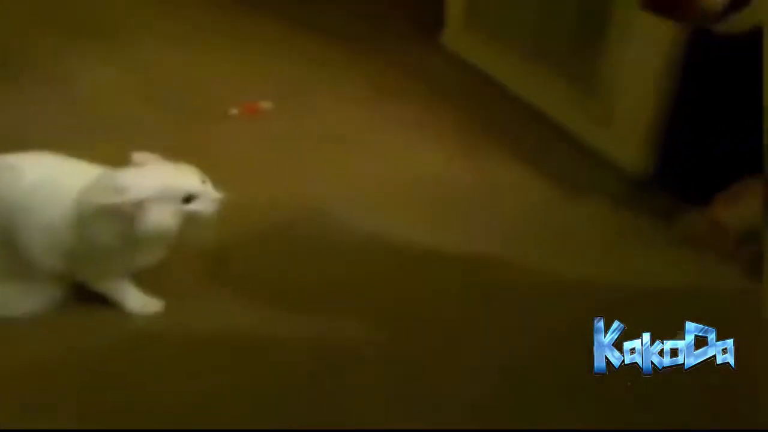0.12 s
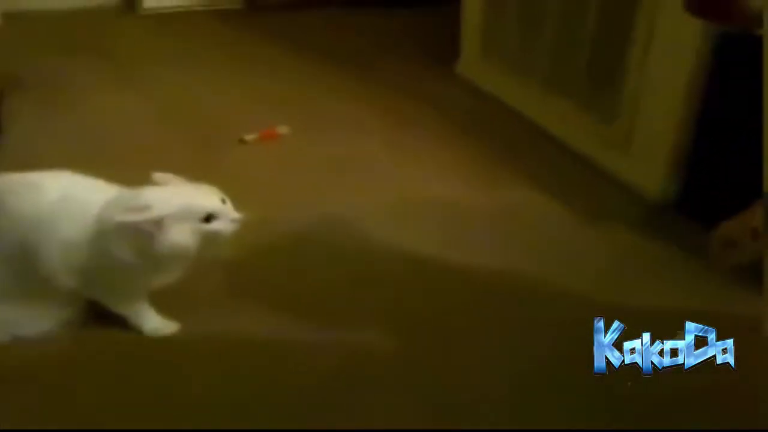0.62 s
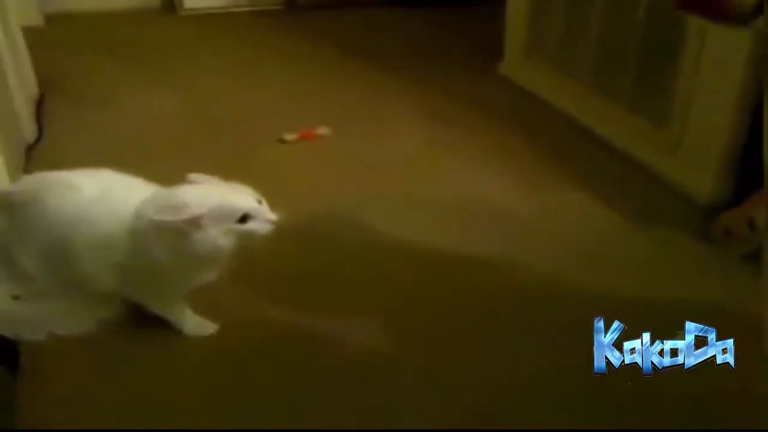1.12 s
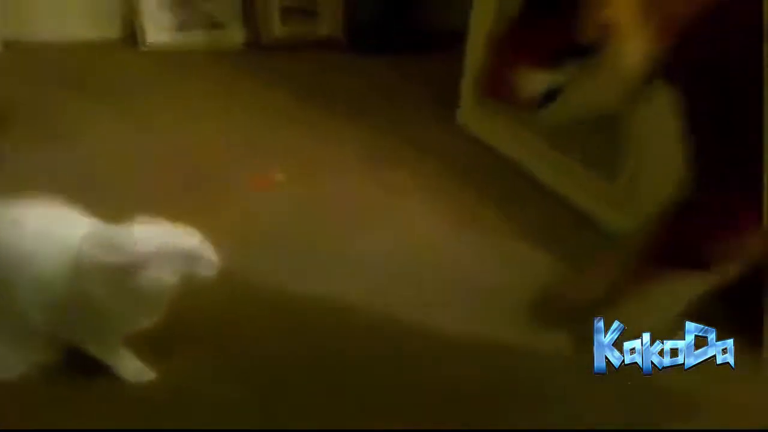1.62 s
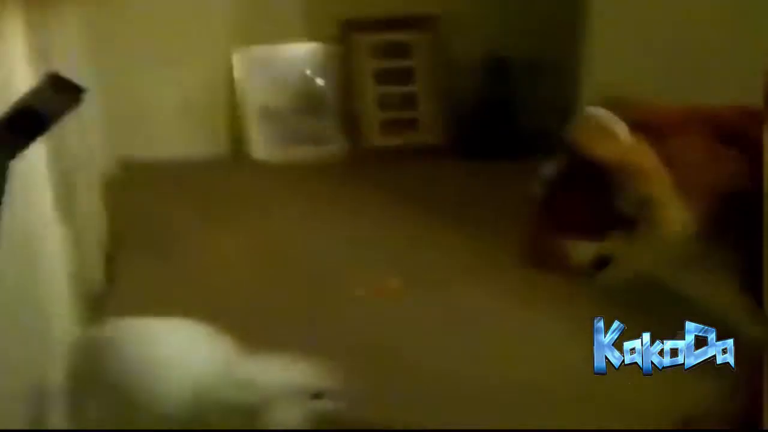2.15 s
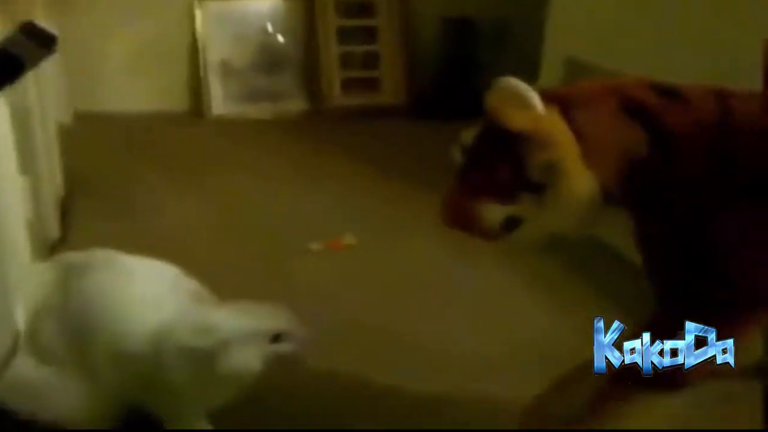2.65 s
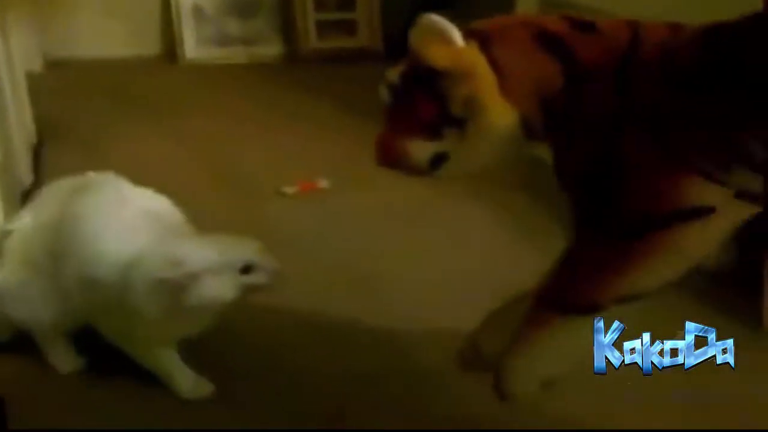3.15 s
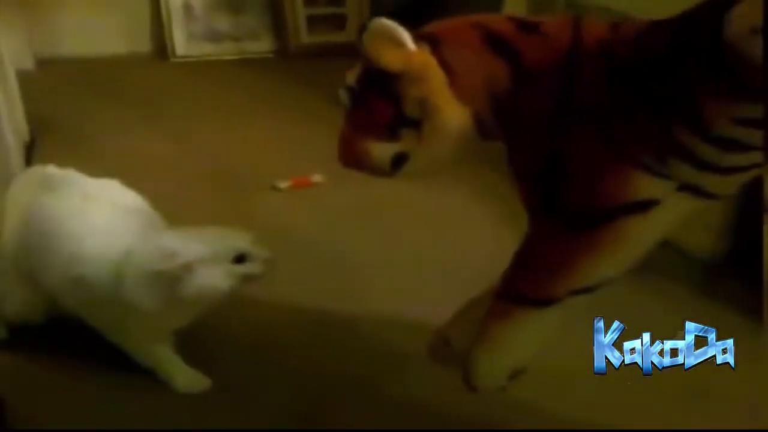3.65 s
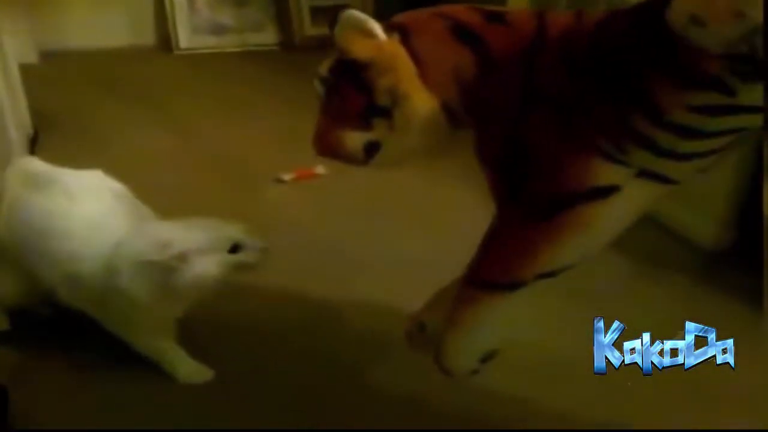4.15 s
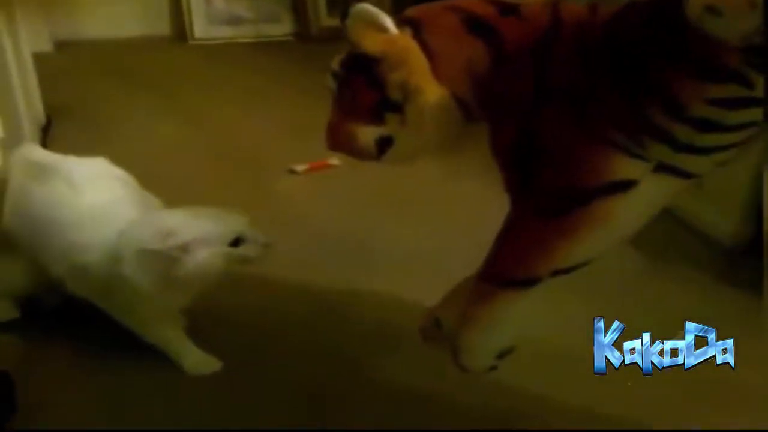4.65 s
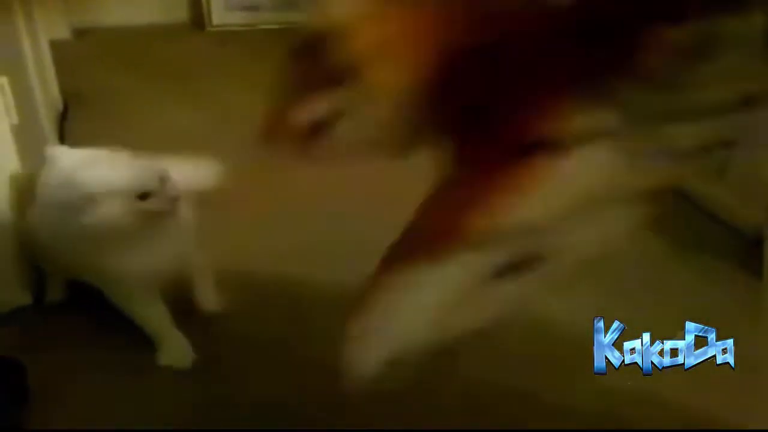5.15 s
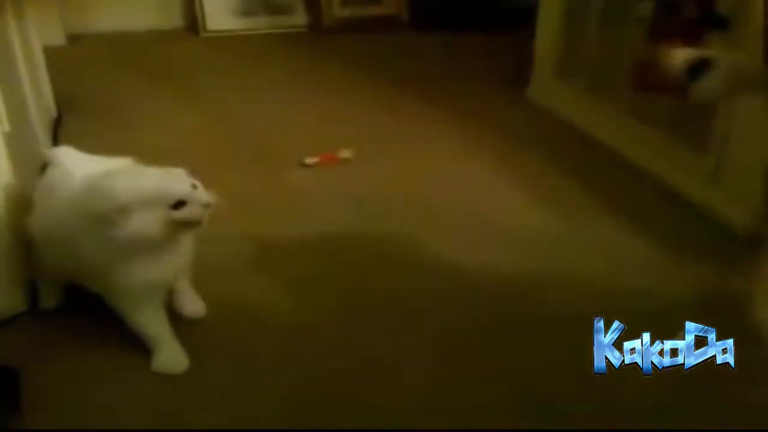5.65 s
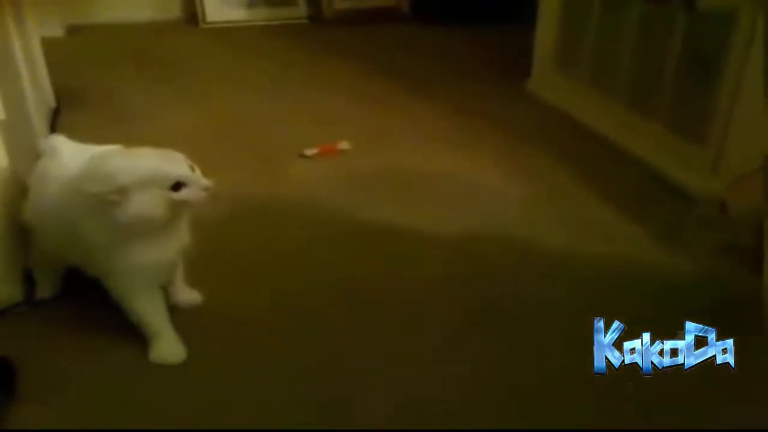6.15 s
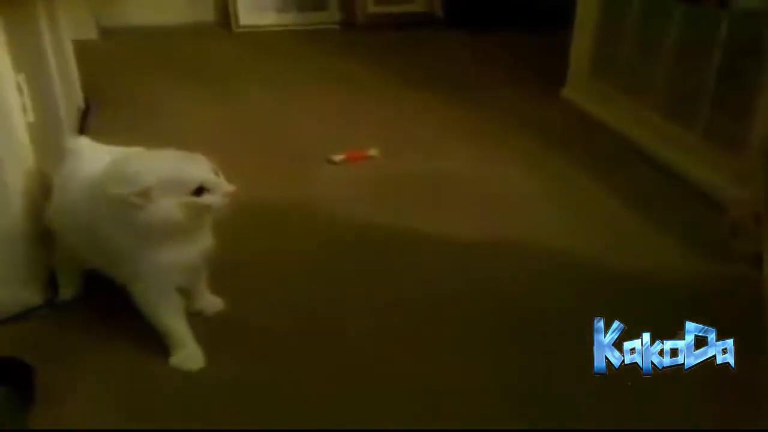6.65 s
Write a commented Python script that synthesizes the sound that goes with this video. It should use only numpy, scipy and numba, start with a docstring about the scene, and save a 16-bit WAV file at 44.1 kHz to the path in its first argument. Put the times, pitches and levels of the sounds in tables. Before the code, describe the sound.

In a carpeted room with a low steady hum, a cat's hoarse low wail glides down, then a small dog very close yaps three times, loud enough to overload the microphone. Ticks, soft thuds and a carpet drag follow. The cat wails high and long, sinking beneath three more barks, the last trailing into a whimper. A scuff, a long soft hiss and one quieter bark end it.

```python
"""A low hum lies under it all. A cat glides down a low wail on a carpeted floor: drifting harmonics and leaking breath.
From 0.57 s a small dog close by barks three times: rough pulses and gasping air through throat resonances.
Dry ticks, soft thuds and a drag of coloured noise follow; at 2.5 s the cat wails high, sinking under three more barks.
The third of these trails into a whimper; then come a scuff, a long soft hiss and at 6.15 s a last, quieter bark.
The cat and the barks ring on in the room through crossed delay lines, and the loud barks overload the input."""
import sys
import numpy as np
from scipy import signal
from scipy.fft import rfft, irfft
from scipy.io import wavfile
from scipy.ndimage import uniform_filter1d
from numba import njit

SR = 44100
rng = np.random.default_rng(int(sys.argv[2]) if len(sys.argv) > 2 else 0)


def digitize_waveform(pressure):
    """Quantize a signal to 16-bit integers and store it at the path in sys.argv[1].

    Rows of a 2-D input are taken as channels; values are limited to [-1, 1].
    """
    field = np.atleast_2d(pressure).T
    bounded = np.clip(field, -1, 1)
    quanta = np.round(bounded * 32767).astype(np.int16)
    wavfile.write(sys.argv[1], SR, quanta)


def makeup_ratio(level_db):
    """Linear amplitude ratio for a level in decibels (20 dB per factor of ten)."""
    decades = np.asarray(level_db, float) / 20
    return 10 ** decades


N = 298998
T = np.arange(N) / SR

# spectrum of the hum: f/Hz, relative level/dB
HUM_COLOUR = [(24, -65), (40, -41.5), (120, -2), (252, -7), (327, -16.5), (350, -16.5), (937, -25.5),
              (1000, -25), (1140, -27.5), (1850, -33.5), (7500, -45.5), (9750, -93), (16500, -120)]
# dry ticks: t/s, level/dB of the swell, f/Hz
TICKS = [(0.4252, -36, 2695), (1.6663, -34, 6140), (1.6834, -36, 3866), (1.7067, -33.5, 4450),
         (1.712, -30.5, 5340), (1.744, -34, 3300), (1.755, -36, 3530), (2.1764, -43, 5730),
         (2.263, -40, 6700), (5.1114, -43, 3920), (5.146, -42, 3800), (5.163, -39, 3800),
         (6.0011, -37, 2880)]
# soft thuds on the floor: t/s, level/dB of the swell, f/Hz
THUDS = [(1.672, -37, 284), (1.818, -42, 210.5), (2.136, -43, 431), (2.17, -35, 503), (2.383, -41, 448)]
# something soft drags over the carpet: t/s, mean level/dB
DRAG_LEVEL = [(1.75, -53), (1.924, -55.5), (2.17, -44), (2.24, -49), (2.436, -49.5), (2.5, -51.5)]
# spectrum of the drag: f/Hz, relative level/dB
DRAG_COLOUR = [(200, -8), (400, 13.5), (1000, -6.5), (1500, -30.5), (4500, -53), (5800, -19), (7000, -33)]
# a short scuff: t/s, mean level/dB
SCUFF_LEVEL = [(5.0, -64), (5.07, -54.5), (5.105, -52), (5.12, -42.5), (5.16, -47), (5.28, -74.5)]
# resonances of the scuff: f/Hz, width/Hz, relative level/dB
SCUFF_RINGS = [(1080, 230, 3.5), (2034, 710, -19), (3800, 200, -12.5), (4430, 230, -15.5),
               (5800, 1400, -24)]
# the cat's long soft hiss: t/s, mean level/dB
HISS_LEVEL = [(5.38, -77.5), (5.45, -61), (5.692, -56.5), (6.0, -53), (6.054, -55.5), (6.14, -70)]
# resonances of the hiss: f/Hz, width/Hz, relative level/dB
HISS_RINGS = [(1030, 450, 1), (1950, 930, -4.5), (2810, 620, -5), (3600, 540, -12), (6370, 830, -12.5)]
# barks: start t/s, lead-in/s, attack/s, hold/s, release/s, level/dB before the shape, peak pitch f/Hz, end pitch f/Hz
BARKS = [(0.569, .011, 0.022, 0.072, .022, -4, 789, 707.5), (0.93, .008, .018, .078, .045, -3.5, 821, 685),
         (1.209, 0.027, 0.029, 0.072, .03, -2, 788.5, 560),
         (4.006, .022, .025, .055, 0.057, -7.5, 815.5, 560),
         (4.255, .03, .027, .055, .08, -4, 909.3, 470.1), (4.461, .018, .018, .078, .068, -5, 775.3, 435.3),
         (6.152, 0.029, .008, 0.053, 0.055, -18, 650.6, 538.7)]
# shape of every bark: stage (0-1 lead-in, 1-2 attack, 2-3 hold, 3-4 release), level/dB, share of the peak pitch,
# share of the fall in pitch, added upper throat level/dB, mouth factor, added roughness
BARK_SHAPE = [(0, -25.5, .72, 0.03, -7.5, .7, -.15), (1, -11.5, .88, 0, -6.5, .95, -0.14),
              (1.999, -2, 0.98, 0.0021, -3.5, 1.03, -0.09), (2.5, -1.22, .99, .08, 0.8, 1.013, .05),
              (2.999, -4.5, .99, .25, 2.5, .97, .08), (3.4, -12, .99, .65, 0, .93, -0.037),
              (4.002, -23, .99, 0.97, -6, 1.2, -.1)]
# voice of each bark before the shape: upper throat level/dB, mouth opening as factor on the resonances,
# roughness (0-1), fizz level/dB, factor on the fizz resonances
BARK_VOICE = [(-1.5, .98, .48, -19.5, 0.84), (-2.5, 1.03, .55, -19.5, 0.72), (1, .92, .55, -27.5, 1.1),
              (3, .99, .68, -20.5, 1.08), (2.5, .93, .62, -23, 1.3), (1.5, .85, .56, -28.5, 1.1),
              (-2, 0.922, .8, -11.5, 1.082)]
# the sixth bark trails off in a low whimper: t/s, pitch f/Hz, level/dB
WHIMPER = [(4.656, 437, -31.5), (4.72, 418.4, -33.5), (4.76, 468, -22), (4.8, 452.7, -30),
           (4.871, 452, -43)]
# voice of the whimper: same columns as BARK_VOICE
WHIMPER_VOICE = (-4, 0.67, .3, -22.5, 4.5)
# throat resonances before the mouth factor: f/Hz, width/Hz, relative level/dB
DOG_THROAT = [(1253, 820, -2), (1480, 450, 0.5), (2019, 260, 3.5)]
# fizz resonances before both factors: f/Hz, width/Hz, relative level/dB
DOG_FIZZ = [(2700, 2200, -5.5), (4610, 1400, 2), (5630, 270, -7.5), (6100, 1100, -14)]
# low wail: t/s, pitch f/Hz, rms level/dB of harmonics 2, 3 and 4
WAIL_LOW = [(0.0, 440, -28, -40.5, -56), (0.054, 427, -34.5, -44.5, -66), (0.084, 409, -36.5, -46, -75),
            (0.106, 402, -35.5, -41, -59.5), (0.21, 396.8, -36, -38, -69),
            (0.266, 387.5, -38.5, -50.5, -55), (0.312, 387.4, -32.5, -36, -58.5),
            (0.356, 380.6, -36.5, -44.5, -65), (0.438, 383.4, -39, -39.5, -57.5),
            (0.47, 376.3, -39, -47, -54.5), (0.566, 364.5, -56.5, -31, -54)]
# high wail: same columns
WAIL_HIGH = [(2.485, 515.2, -51, -81.5, -80.5), (2.497, 498, -45, -74, -59.5),
             (2.539, 572.3, -31.5, -54.5, -59.5), (2.589, 602.2, -35.5, -46, -40.5),
             (2.603, 605.6, -56.5, -57, -53), (2.619, 607, -39.5, -40, -48), (2.687, 627, -42, -30, -59.5),
             (2.707, 562, -40, -36.5, -41.5), (2.721, 560.6, -36.5, -27.5, -40.5),
             (2.737, 548.8, -33, -36.5, -30.5), (2.843, 547, -32.5, -37.5, -34.5),
             (2.863, 545.9, -36, -62, -33.5), (2.905, 547.5, -33, -48, -31.5),
             (2.957, 548.5, -36.5, -28, -34.5), (3.079, 539.6, -36, -24.5, -31),
             (3.117, 536.2, -34, -44, -32.5), (3.133, 534.5, -31.5, -23.5, -34.5),
             (3.189, 531.5, -33.5, -21, -39.5), (3.217, 540, -32, -43, -40.5),
             (3.235, 534.8, -30, -27, -33), (3.315, 532.3, -28.5, -25, -31),
             (3.335, 527.3, -28.5, -28.5, -49), (3.361, 520.4, -30, -24.5, -34.5),
             (3.387, 518.8, -24.5, -28.5, -38), (3.969, 517.9, -25, -25.5, -37.5),
             (4.0, 516.4, -27.5, -33.5, -36.5)]
# the high wail sinks away under the barks: same columns
WAIL_END = [(4.14, 504, -31, -33, -40), (4.27, 490, -31, -35, -43), (4.45, 497, -42, -46, -52),
            (4.62, 502, -48, -50, -56), (4.77, 472, -52, -58, -60), (4.815, 458, -56, -62, -64),
            (4.85, 432, -70, -75, -78)]
# level/dB against the low wail's loudness: fundamental, harmonics from 8 up (these before CAT_TREBLE)
WEAK_LOW = (-17.5, -25)
# the same two levels/dB for the high wail
WEAK_HIGH = (-29, -26.5)
# mouth colour of harmonics 5 to 7, low wail: f/Hz, level/dB against the loudness before CAT_TREBLE
CAT_MID_LOW = [(1850, -23.5), (2100, -23.5), (2300, -13.5), (2650, -17), (3000, -38.5)]
# the same for the high wail
CAT_MID_HIGH = [(2300, -8.5), (2450, -19), (2600, -22.5), (2750, -23), (3150, -23), (3300, -27.5),
                (3650, -35.5), (4300, -24.5)]
# colour of harmonics 8 to 19, low wail: f/Hz, relative level/dB
CAT_TOP_LOW = [(1760, -33), (3000, -14), (3830, -19), (4390, -1), (6030, -22), (6940, -18.5), (7400, -40.5),
               (9620, -76), (16300, -120)]
# the same for the high wail
CAT_TOP_HIGH = [(2350, -35.5), (4000, -16), (4500, -20.5), (4680, 3), (4850, -14), (6590, -17.5),
                (7400, -32.5), (9620, -65), (16300, -120)]
# treble of the cat against its loudness: t/s, level/dB
CAT_TREBLE = [(0, -5.5), (.1, -.5), (.5, 2.5), (2.49, -12.5), (2.55, -5), (2.62, 3.5), (2.7, -6), (2.76, 4),
              (3.0, -1.5), (3.2, -0.5), (3.4, -4.5), (4.0, -1.5), (4.3, -0.5), (4.62, 7), (4.82, 3.5)]
# how hoarse the cat is: t/s, roughness (0-1)
CAT_ROUGH = [(0, .6), (.1, .7), (.15, .45), (2.5, .8), (2.65, .55), (2.7, 1), (2.8, .65), (3.35, .5),
             (3.42, .15)]
# spectrum of the cat's breath: f/Hz, relative level/dB
CAT_BREATH = [(900, -32), (1800, 0), (3000, 0.5), (5500, -0.5), (7200, -7.5)]


def unit(x):
    """Brings a sound to rms 1."""
    return x / np.sqrt(np.mean(x ** 2))


def steady(x):
    """Even power over about 15 ms, as a steady push of the lungs gives."""
    return x / np.sqrt(uniform_filter1d(x ** 2, size=660) + 1e-12)


def curve(rows, column, outside=None):
    """One column of a table at every sample; outside replaces the held end values."""
    rows = np.array(rows, float)
    return np.interp(T, rows[:, 0], rows[:, column], outside, outside)


def walk(rate):
    """Slow random drift: levels held 1 / rate seconds and slewed twice."""
    k = max(int(SR / rate), 2)
    held = np.repeat(rng.standard_normal(N // k + 1), k)
    return 0.97 * uniform_filter1d(uniform_filter1d(held, k), k)[:N]


def tint(hz, points):
    """Gain of a spectrum table at the given frequencies, straight in dB over log frequency."""
    f, db = np.transpose(points)
    return makeup_ratio(np.interp(np.log(np.maximum(hz, 1)), np.log(f), db))


def coloured(points):
    """Steady noise of a given spectrum, rms 1."""
    hz = np.arange(N // 2 + 1) * SR / N
    spectrum = rfft(rng.standard_normal(N)) * tint(hz, points)
    return unit(irfft(spectrum, N))


@njit
def svf(x, hz, width, low):
    """State-variable filter with a movable centre; low blends from band-pass (0) to low-pass (1)."""
    y, band, bass = np.empty(len(x)), 0., 0.
    for i in range(len(x)):
        g, k = np.tan(np.pi * hz[i] / SR), width / hz[i]
        v = (band + g * (x[i] - bass)) / (1 + g * (g + k))
        y[i] = (1 - low) * k * v + low * (bass + g * v)
        band, bass = 2 * v - band, bass + 2 * g * v
    return y


def ringing(x, modes, shift=1):
    """A sound through a few resonances, each applied twice so the valleys stay dark."""
    out = np.zeros(N)
    for hz, width, db in modes:
        centre = np.full(N, hz) * shift
        once = svf(x, centre, 1. * width, 0.)
        out += makeup_ratio(db) * svf(once, centre, 1. * width, 0.)
    return out


def low_hum():
    """Steady noise, heaviest in the bass, whose level drifts gently."""
    return makeup_ratio(-49 + 1.5 * walk(6)) * coloured(HUM_COLOUR)


@njit
def walls(x, lags, gain, damp):
    """Echoes between walls: eight delay lines feed each other, duller on every round."""
    line, soft, out = np.zeros((8, 4096)), np.zeros(8), np.zeros(len(x))
    for i in range(len(x)):
        total = 0.
        for k in range(8):
            soft[k] += (1 - damp) * (gain[k] * line[k, (i - lags[k]) & 4095] - soft[k])
            total += soft[k]
            out[i] += soft[k] * (1 - 2 * (k % 2))  # alternate signs
        for k in range(8):
            line[k, i & 4095] = x[i] + soft[k] - total / 4
    return out


def room_ring(cat, barks):
    """Both voices ring on in the room; longer lines lose more per round, so all decay alike."""
    t60_s, damp = 0.51, 0.069  # decay time before the damping
    lags = np.array([541, 683, 829, 997, 1171, 1361, 1583, 1861])  # samples
    send = makeup_ratio(-18.0) * barks + makeup_ratio(-18.5) * cat + 1e-18
    return walls(send, lags, makeup_ratio(-60 * lags / SR / t60_s), damp)


def ticks(rows, rise_cycles):
    """Small knocks: each is a few cycles of a tone that swell and die at once."""
    out, t = np.zeros(N), np.arange(2000) / SR
    for start, db, hz in rows:
        i, u = int(start * SR), t * hz / rise_cycles
        swell = np.e * u * np.exp(-u)
        out[i:i + len(t)] += makeup_ratio(db) * swell * np.sin(2 * np.pi * hz * t)
    return out


def carpet_drag():
    """Soft friction over the carpet: coloured noise of uneven level."""
    return makeup_ratio(curve(DRAG_LEVEL, 1, -120) + 2.0 * walk(30)) * coloured(DRAG_COLOUR)


def rung_noise(level, rings, wobble_db, rate, plain):
    """Uneven noise through resonances, with a little plain noise between them."""
    ring = ringing(rng.standard_normal(N), rings)
    body = unit(ring + plain * rng.standard_normal(N))
    return makeup_ratio(curve(level, 1, -120) + wobble_db * walk(rate)) * body


def scuff():
    """A short rub: noise in narrow resonances, quickly uneven."""
    return rung_noise(SCUFF_LEVEL, SCUFF_RINGS, wobble_db=1.3, rate=67, plain=0.027)


def cat_hiss():
    """The cat's breath as a long soft hiss: noise in broad resonances, slowly uneven."""
    return rung_noise(HISS_LEVEL, HISS_RINGS, wobble_db=0.7, rate=22, plain=0.06)


def bark_rows():
    """Every bark follows the common shape at its own pace, loudness, pitch and voice; silence lies between."""
    calls = []
    for bark, voice in zip(BARKS, BARK_VOICE):
        *times, db, hz, end_hz = bark
        upper_db, mouth, rough, *fizz = voice
        call = []
        for stage, level, pitch, fall, bright, gape, more in BARK_SHAPE:
            t = np.interp(stage, range(5), np.cumsum(times))
            now_hz = hz * pitch + fall * (end_hz - hz)
            call.append((t, now_hz, db + level, upper_db + bright, mouth * gape, rough + more, *fizz))
        calls.append(call)
    calls.append([(*row, *WHIMPER_VOICE) for row in WHIMPER])
    rows = []
    for call in calls:
        first, last = call[0], call[-1]
        fade_in = (first[0] - .004, first[1], -120, *first[3:])
        fade_out = (last[0] + .004, last[1], -120, *last[3:])
        rows += [fade_in, *call, fade_out]
    return sorted(rows)


def dog():
    """Overdriven folds: wavering pitch and fluttering size, with gasping air, ring the throat."""
    rows = bark_rows()
    hz, db, upper_db, mouth, rough, fizz_db, teeth = (curve(rows, k) for k in range(1, 8))
    rough = np.clip(rough, 0, 1)
    phase = 2 * np.pi * np.cumsum(hz * (1 + .16 * rough * walk(250))) / SR
    # strong and weak puffs alternate when the voice is rough, filling in between the harmonics
    puffs = np.exp(1.6 * (np.cos(phase) - 1)) * (1 + .83 * rough * np.cos(phase / 2))
    air = rough * 7.5 * rng.standard_normal(N)
    # the first throat resonance rides on the pitch
    first = steady(np.cos(phase) + ringing(air, [(1.06, 400, -2)], hz))
    source = np.gradient(puffs) * 6.6 + air * (1.0 + puffs)
    throat = ringing(source, DOG_THROAT, mouth)
    for _ in range(4):  # little passes beyond the third resonance
        throat = svf(throat, 2220 * mouth, 1900., 0.88)
    fizz = steady(ringing(source, DOG_FIZZ, mouth * teeth))
    upper = steady(throat) + makeup_ratio(fizz_db) * fizz
    voice = makeup_ratio(db + 3.5 * rough * walk(180)) * steady(first + makeup_ratio(upper_db) * upper)
    # a small head radiates little bass
    return signal.sosfilt(signal.butter(2, 520, "high", fs=SR, output="sos"), voice)


def wail(rows, weak_db, mid_colour, top_colour):
    """Steady vocal folds: a clean stack of harmonics; the weaker ones swell and fade one by one."""
    weak_flicker_db, top_flicker_db, breath_db = 7, 9.0, -6.0
    rough = curve(CAT_ROUGH, column=1)
    hz = curve(rows, column=1) * (1 + 0.008 * rough * walk(90))
    phase = 2 * np.pi * np.cumsum(hz) / SR
    size = {k: makeup_ratio(curve(rows, k, -120)) for k in (2, 3, 4)}
    power = sum(a ** 2 for a in size.values())
    loud = np.sqrt(uniform_filter1d(power, size=1500) + 1e-14)
    treble = loud * makeup_ratio(curve(CAT_TREBLE, column=1))
    size[1] = loud * makeup_ratio(weak_db[0] + weak_flicker_db * rough * walk(10))
    for k in (5, 6, 7):
        size[k] = treble * tint(k * hz, mid_colour) * makeup_ratio(weak_flicker_db * rough * walk(20))
    low = sum(a * np.sin(k * phase + k * k) for k, a in size.items())
    top = np.zeros(N)
    for k in range(8, 20):
        top += tint(k * hz, top_colour) * makeup_ratio(top_flicker_db * walk(25)) * np.sin(k * phase + k * k)
    # hoarse folds leak air between the harmonics
    breath = makeup_ratio(breath_db) * rough * coloured(CAT_BREATH)
    return np.sqrt(2) * low + treble * makeup_ratio(weak_db[1]) * steady(steady(top) + breath)


def scene():
    """Sums the hum, floor noises, room, dog and cat into one channel."""
    low_wail = wail(WAIL_LOW, WEAK_LOW, CAT_MID_LOW, CAT_TOP_LOW)
    high_wail = wail(WAIL_HIGH + WAIL_END, WEAK_HIGH, CAT_MID_HIGH, CAT_TOP_HIGH)
    cat = low_wail + high_wail
    barks = dog()
    floor = ticks(TICKS, 0.4) + ticks(THUDS, 1.5) + carpet_drag() + scuff()
    mix = low_hum() + room_ring(cat, barks) + floor + cat_hiss() + barks + cat
    return mix[None]


def roll_off(x):
    """The treble ends steeply here."""
    return signal.sosfilt(signal.butter(12, 15750, fs=SR, output="sos"), x)


def record(dry):
    """The input clips, a little lopsided, on the barks; a narrow converter cuts the treble; overshoots are shaved."""
    x = signal.sosfilt(signal.butter(2, 90, "high", fs=SR, output="sos"), dry)
    x = signal.sosfilt(signal.butter(8, 7000, fs=SR, output="sos"), x)
    overloaded = np.clip(x, -.7, .705)
    narrow = signal.sosfilt(signal.cheby1(8, .5, 7900, fs=SR, output="sos"), overloaded)
    mix = np.clip(narrow, -.75, .75)
    return roll_off(mix)


dry = scene()
out = record(dry)
digitize_waveform(out)
```